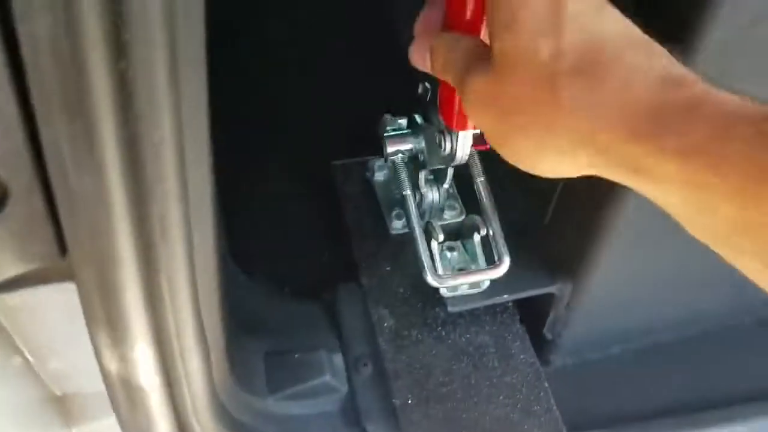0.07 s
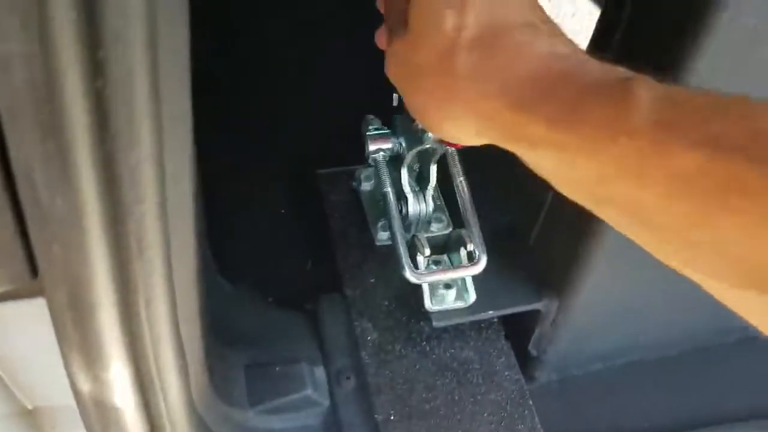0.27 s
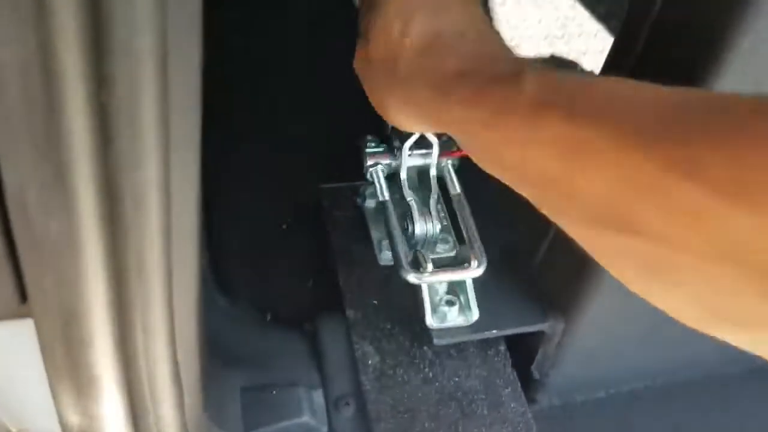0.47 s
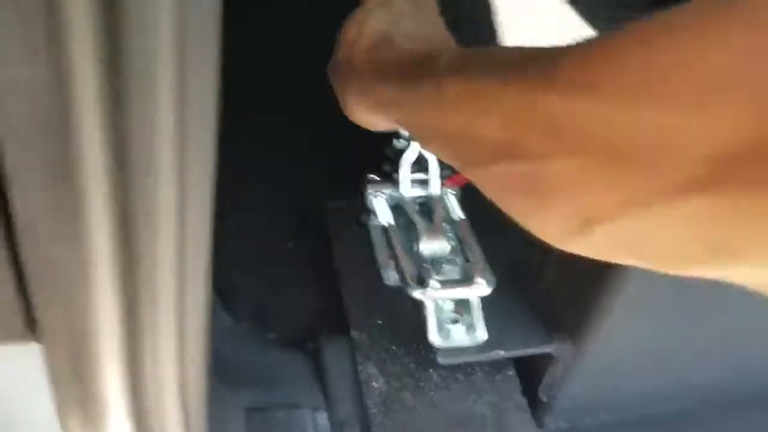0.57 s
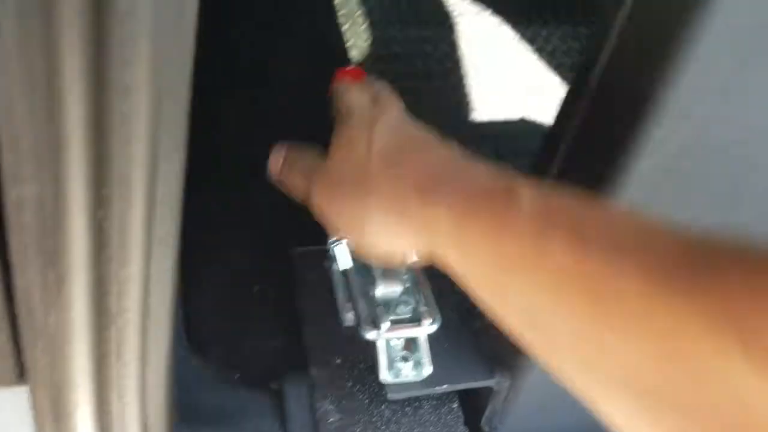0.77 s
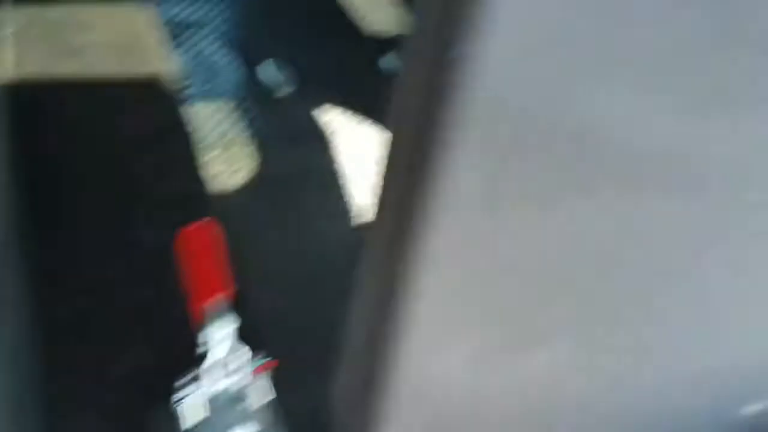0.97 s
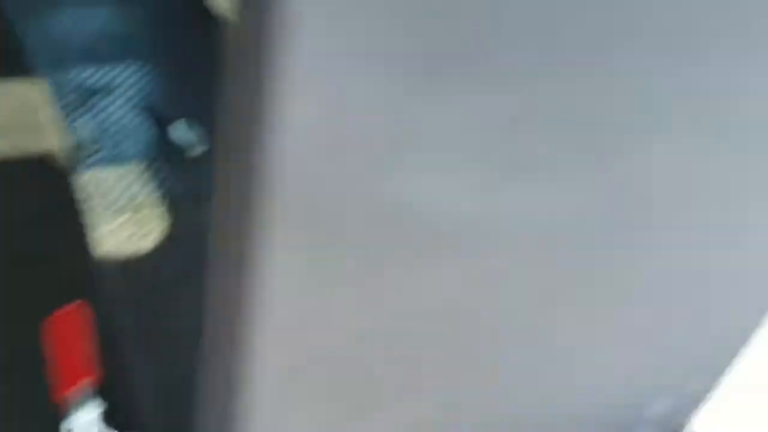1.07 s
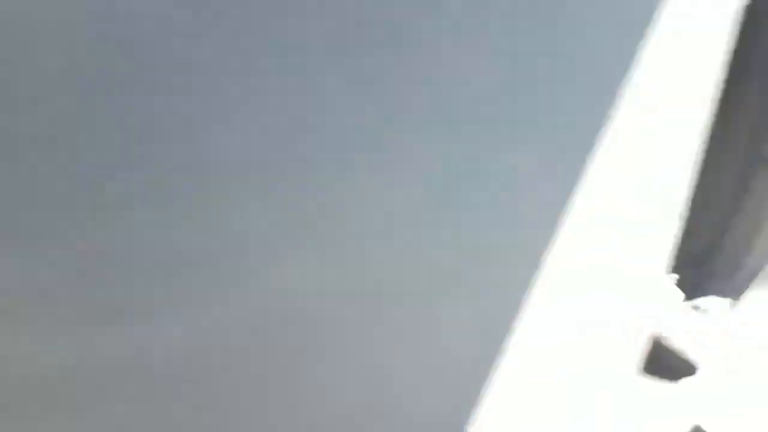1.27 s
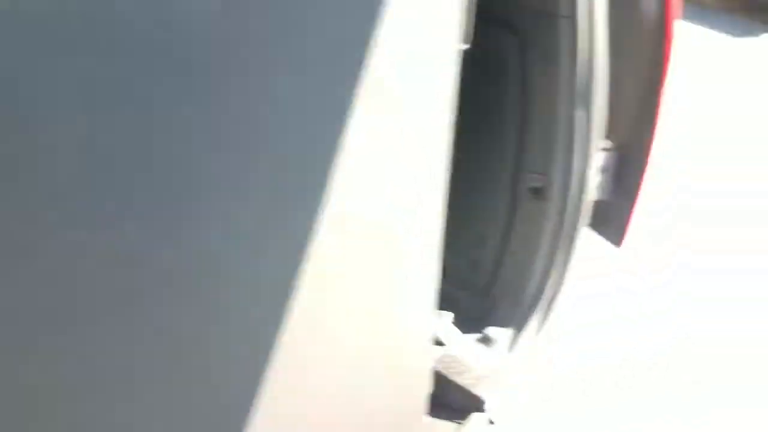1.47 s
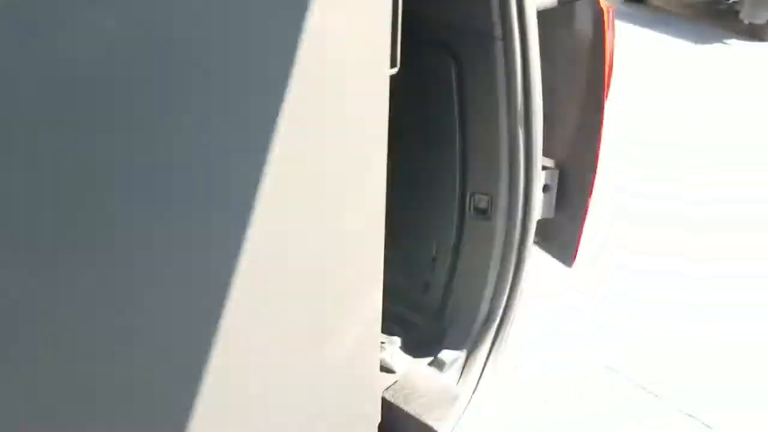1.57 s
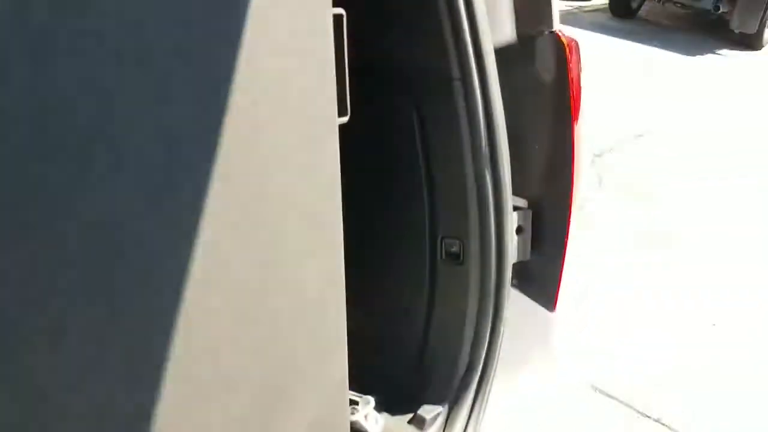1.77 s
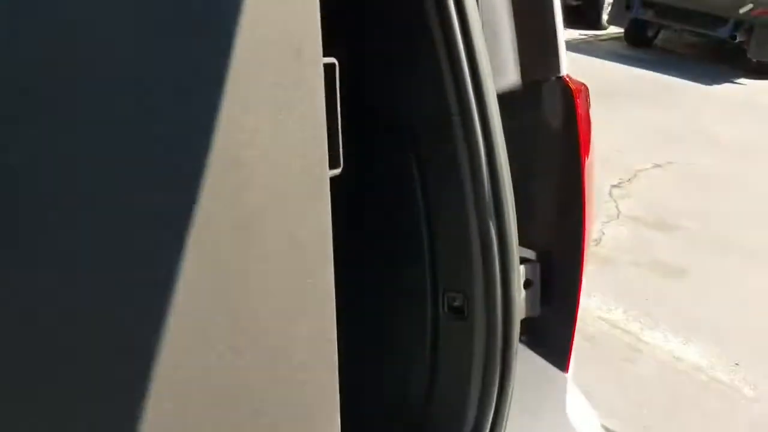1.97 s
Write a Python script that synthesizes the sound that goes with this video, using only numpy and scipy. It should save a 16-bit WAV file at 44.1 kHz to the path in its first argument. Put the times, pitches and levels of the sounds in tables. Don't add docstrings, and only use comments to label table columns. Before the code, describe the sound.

A metal toggle clamp is closed by hand: its loose loop drops and bounces with a bright ring over a hollow panel boom, then the handle snaps in two quick clicks, close-miked, with faint traffic outside.

```python
import sys
import numpy as np
from scipy import signal
from scipy.fft import rfft, irfft
from scipy.io import wavfile
from scipy.ndimage import uniform_filter1d

SR = 44100
rng = np.random.default_rng(int(sys.argv[2]) if len(sys.argv) > 2 else 0)


def to_linear_factor(level_db):
    exponent = np.asarray(level_db, float) / 20
    return 10 ** exponent


def int16_out(signal):
    q = np.round(np.clip(np.atleast_2d(signal).T, -1, 1) * 32767)
    wavfile.write(sys.argv[1], SR, q.astype(np.int16))


N = 88244

# frequency in Hz, spread in radians.
PORT_SPREAD = [(200, 0.68), (500, 0.37), (1200, 1.32), (2000, 2.06), (3000, 0.9), (5000, 1.0), (9000, 1.96),
               (14000, 1.2)]
# frequency in Hz, left over right in dB.
PORT_LEAN = [(60, -8), (110, -4.5), (200, -5.5), (380, -0.5), (700, -4), (1290, 5), (2380, -1.5),
             (4400, -1), (8120, 5), (15000, 3)]


def evened(x):
    return x / np.sqrt(np.mean(x ** 2) + 1e-20)


def read(points, hz):
    f, value = np.transpose(points)
    return np.interp(np.log(hz + 1), np.log(f + 1), value)


def over_time(points, t):
    return np.interp(t, *np.transpose(points))


def lumpy(count, size):
    return evened(uniform_filter1d(rng.standard_normal(count), size=size))


def add(mix, s, sound):
    part = mix[:, round(s * SR):][:, :sound.shape[1]]
    part += sound[:, :part.shape[1]]


def ring(modes, rise_s=.0007, length=.6):
    hz, db, t60 = np.transpose(modes)[:, :, None]
    t = np.arange(0, length, 1 / SR)
    gap = read(PORT_SPREAD, hz) * rng.choice([-1., 1.], hz.shape) / 2
    lean_db = read(PORT_LEAN, hz) / 2
    shape = to_linear_factor(db - 60 * t / t60) * (1 - np.exp(-t / rise_s))
    ports = [shape * to_linear_factor(side * lean_db) * np.sin(2 * np.pi * hz * t + side * gap) for side in (1, -1)]
    return np.array([port.sum(0) for port in ports])


def choked(sound, start, chokes):
    choke_s = 0.00061
    t = start + np.arange(sound.shape[1]) / SR
    return sound * to_linear_factor(sum(db * np.clip((t - s) / choke_s, 0, 1) for s, db in chokes if s > start))


def hiss(colour, count):
    hz = np.fft.rfftfreq(count, 1 / SR)
    a, b = rfft(rng.standard_normal((2, count)))
    same = np.cos(np.clip(read(PORT_SPREAD, hz), 0, 3))
    lean = to_linear_factor(read(PORT_LEAN, hz) / 2)
    z = np.array([a * lean, (same * a + np.sqrt(1 - same ** 2) * b) / lean])
    return evened(irfft(z * to_linear_factor(read(colour, hz)) * (hz > colour[0][0] / 2), count))


def crack(colour, t60):
    # frequency in Hz, width in Hz, depth in dB.
    gaps = [(3700, 200, -14), (6150, 220, -16), (7600, 350, -12), (8700, 250, -10), (12000, 700, -20)]
    tail_db, tail_t60_s, dull_hz, dips_db, rise_s = -13, 0.17, 4000, 4.5, 0.00094
    t = np.arange(8192) / SR
    noise = hiss(colour, count=8192)
    lumps = to_linear_factor(2.5 * lumpy(8192, 120))
    dips = to_linear_factor(dips_db * lumpy(4097, 70))
    hz = np.arange(4097) * SR / 8192
    dips *= to_linear_factor(sum(db * np.exp(-((hz - f) / width) ** 2) for f, width, db in gaps))
    r = np.exp(-2 * np.pi * dull_hz / SR)
    tail = signal.lfilter([1 - r], [1, -r], evened(irfft(rfft(noise) * dips)))
    tail = tail * lumps * to_linear_factor(tail_db - 60 * t / tail_t60_s)
    return (noise * to_linear_factor(-60 * t / t60) + tail) * np.minimum(t / rise_s, 1)


def traffic_wash():
    # time in seconds, level in dB.
    wash_db = [(0, -37), (.35, -41.5), (.6, -43.5), (.75, -49), (1.11, -45.5), (1.13, -42.5), (1.4, -38.5),
               (1.68, -36), (2, -37.5)]
    # frequency in Hz, level in dB.
    colour = [(22, -45.5), (80, -9.5), (200, -11), (372, -6.5), (1320, -4), (2200, -14.5), (4500, -33),
              (7500, -49)]
    # frequency in Hz, likeness of the ports from 0 to 1.
    likeness = [(60, 0), (240, 0.86), (950, 0.032), (3770, 0), (15000, 0.67)]
    # frequency in Hz, left over right in dB.
    balance = [(60, -7.5), (110, -8), (200, -1.5), (380, -1.5), (700, -2), (1290, 0.5), (2380, 1),
               (4400, -1), (8120, 5.5), (15000, 2)]
    # frequency in Hz, width in Hz, gain in dB.
    doorway = [(437, 160, 6.5), (984, 110, 3.5), (1412, 120, 5.5)]
    patch_db, flicker_db, open_db = 1.5, .8, -38.5
    rumble_hz, rumble_width_hz, rumble_hold = 200, 89, 0.89
    frames, hz = N // 256 + 5, np.fft.rfftfreq(1024, 1 / SR)
    a, b, c, d, patches = rng.standard_normal((frames, 513, 5)).T
    patches = evened(uniform_filter1d(uniform_filter1d(patches, size=10, axis=0), size=8, axis=1))
    flicker = lumpy(frames, 4)
    same = np.clip(read(likeness, hz), -1, 1)[:, None]
    lean = to_linear_factor(read(balance, hz) / 2)[:, None]
    left = a + 1j * b
    z = np.array([left * lean, (same * left + np.sqrt(1 - same ** 2) * (c + 1j * d)) / lean])
    colour_db = read(colour, hz) + sum(db * np.exp(-((hz - f) / w) ** 2) for f, w, db in doorway)
    shut_db = open_db - over_time(wash_db, np.arange(frames) * 256 / SR)
    z *= to_linear_factor(rumble_hold * shut_db * np.exp(-((hz[:, None] - rumble_hz) / rumble_width_hz) ** 2))
    z *= to_linear_factor(colour_db[:, None] + patch_db * patches + flicker_db * flicker)
    wash = evened(signal.istft(z, nperseg=1024, noverlap=768)[1][:, :N])
    # frequency in Hz, level in dB.
    mic_hiss = [(5000, -3), (8000, -5), (13000, -6.5), (16000, -0.5)]
    wash += to_linear_factor(-46) * hiss(mic_hiss, count=N)
    t = np.arange(N) / SR
    return (wash + engine_hum(t)) * to_linear_factor(over_time(wash_db, t) + 3.0)


def engine_hum(t):
    # time in seconds, swell in dB.
    swell = [(0, -8), (.7, 4), (.95, 4), (1.03, 7), (1.1, 0.5), (1.18, 7), (1.36, 8), (1.45, -2.5),
             (1.54, 4), (1.66, -3), (1.76, 7), (1.9, 3), (2, 0)]
    hum_hz, width_hz, hum_db = 109, 10, -17
    r = np.exp(-np.pi * width_hz / SR)
    waver = signal.lfilter([1], [1, -r], rng.standard_normal(N) + 1j * rng.standard_normal(N))
    drift = evened(abs(waver)).mean() + waver / abs(waver).mean()
    hum = evened((drift * np.exp(2j * np.pi * hum_hz * t)).real)
    return to_linear_factor(hum_db + over_time(swell, t)) * hum * to_linear_factor([[-2], [2]])


def feet():
    # start in seconds, level in dB, pitch in Hz.
    bumps = [(.06, -27.5, 200), (.1, -29, 182), (0.389, -19.5, 291), (0.522, -29, 215), (0.545, -21, 297),
             (.58, -25, 258.6), (.633, -25, 467), (0.656, -32.5, 209), (.975, -31, 840),
             (1.118, -29.5, 1095), (1.135, -32.5, 860)]
    # frequency in Hz, level in dB.
    sole = [(1760, -32), (3000, -6), (6810, -8.5), (8110, -18.5), (13700, -14), (16000, -18)]
    scuff_s, length_s, scuff_db, fade_db = 1.658, 0.078, -44.5, -13
    out = np.zeros((2, N))
    for s, db, hz in bumps:
        add(out, s, to_linear_factor(db) * ring([(hz, 0, .07), (hz * .74, -5, .06), (hz * 1.3, -6, .05)], 0.0021, .2))
    t = np.arange(0, length_s, 1 / SR)
    shape = np.clip(np.minimum(t / 0.012, (length_s - t) / 0.0078), 0, 1)
    shape = shape * to_linear_factor(scuff_db + fade_db * t / length_s)
    grain = to_linear_factor(1.7 * lumpy(len(t), 150))
    add(out, scuff_s, hiss(sole, count=8192)[:, :len(t)] * shape * grain)
    return out


def bail():
    # start in seconds, then crack, bail ring, panel boom and rattle in dB.
    drops = [(0.0374, -7, -12, -11.5, -32), (0.049, -31, -40.5, -30.5, -43), (0.1322, -13, -18.5, -36, -18),
             (.142, -45, -49, -19.5, -52), (0.1568, -25, -38, -37, -21), (0.1692, -20.5, -26.5, -33, -32),
             (0.1864, -30, -50, -24, -26), (0.1964, -29, -53, -30.5, -26), (.2024, -34, -46.5, -73, -24),
             (0.218, -43.5, -59, -50, -33.5), (.389, -59, -68.5, -27, -60)]
    # frequency in Hz, level in dB, t60 in seconds.
    bail_modes = [(14090, 0, .055), (13190, -17, .07), (15470, -20, .16), (7224, -18, .07),
                  (8559, -12, .05), (9448, -24, .15), (10900, -10, .04), (13370, -20, .08),
                  (14810, -10, .03), (6500, -10, .04), (4800, -8, .022)]
    panel_modes = [(188.7, -25, 0.81), (287.3, -24.5, 0.73), (790, -15.5, 0.12), (916, -16.5, 0.044),
                   (314, -4.5, 0.47), (421.6, -11, 1.5), (437.2, 3, 0.088), (482.6, -8.5, 0.45),
                   (541, -7, 0.22), (601, -10, 0.2), (636, -9.5, .15), (1107, -5, 0.087),
                   (1468, -2.5, 0.085)]
    cavity_modes = [(345.85, 4.5, 0.93), (374.4, -2.5, 1)]
    rattle_modes = [(5050, 3, 0.025), (5230, -11.5, 0.014), (4450, -10.5, .02), (4820, -8.5, 0.033),
                    (5950, -16, 0.055), (3980, -9.5, 0.024)]
    catch_modes = [(3774, -47, 1.7), (5556, -44, .5), (2896, -35, .6), (10306, -19, .13), (10610, -24, .07)]
    # frequency in Hz, level in dB.
    crack_colour = [(500, -19.5), (1300, -6), (4870, -4), (7420, -14.5), (10500, -1.5), (12000, -12.5),
                    (14000, 0.5), (16000, -17)]
    # time in seconds, change in dB.
    panel_chokes = [
        (0.126, -9.5),
        (0.23, -3),
        (.389, -3),
        (0.468, -7),
    ]
    grip_s, grip_db_per_s = .386, 900
    out, steel = np.zeros((2, N)), np.zeros((2, N))
    sing, rattle = ring(bail_modes), ring(rattle_modes)
    boom = ring(panel_modes, rise_s=0.0029) + ring(cavity_modes, rise_s=0.056)
    add(steel, drops[0][0], ring(catch_modes))
    for s, crack_db, ring_db, boom_db, rattle_db in drops:
        add(steel, s, to_linear_factor(ring_db) * sing)
        add(out, s, to_linear_factor(crack_db) * crack(crack_colour, t60=0.015))
        add(out, s, to_linear_factor(boom_db) * choked(boom, s, panel_chokes))
        add(out, s, to_linear_factor(rattle_db) * rattle)
    gripped_s = np.maximum(np.arange(N) / SR - grip_s, 0)
    return out + steel * to_linear_factor(-grip_db_per_s * gripped_s)


def handle():
    # start in seconds, then crack, plate ring, thud and hook ring in dB.
    clicks = [(0.389, -30, -44, -25, -17.5), (0.4744, -9.5, -13.5, -20, -27), (0.476, -23, -26, -43, -34),
              (.486, -20, -15, -43, -34), (0.5037, -11, -14.5, -9.5, -17), (.508, -17, -20.5, -12, -31),
              (.5165, -21.5, -25.5, -21, -39), (.528, -42.5, -33, -34.5, -48.5), (.539, -49, -43, -31, -56),
              (0.551, -58, -43, -46, -63), (0.6319, -28.5, -38, -40, -37.5)]
    # frequency in Hz, level in dB, t60 in seconds.
    plate_modes = [(2906, -4, .05), (2972, -1, .055), (3010, -3, .05), (1830, -2, .07), (1965, -5, .06),
                   (630, -6, .12), (733, -8, .12), (2056, -6, .06), (1300, -13, .1), (1525, -6, .07),
                   (1645, -11, .07), (3108, -10, .07), (4610, -15, .04)]
    thud_modes = [(436, 4, .075), (470, 0, .06), (339, 0, .08), (525, -3, .08), (246, -12, .12),
                  (616, -5, .1), (698, -10, .08)]
    hook_modes = [(4156, 3, 0.013), (2966, -9, 0.036), (10960, -9.5, .015), (4650, -5, 0.012),
                  (6660, -13.5, .015)]
    # frequency in Hz, level in dB.
    crack_colour = [(450, -42), (700, 3), (1900, 6), (2440, -10), (3030, -41), (4440, -6), (8000, -13),
                    (16000, -11)]
    # time in seconds, change in dB.
    plate_chokes = [(.4815, -4), (.494, -6), (.5135, -5), (.531, -13), (.641, -12)]
    thud_chokes = [(.494, -4), (.531, -5.5), (.66, -6)]
    scrape_s = 0.0027
    out, t = np.zeros((2, N)), np.arange(1024) / SR
    plate, thud, hook = ring(plate_modes, rise_s=0.0015), ring(thud_modes, rise_s=0.0031), ring(hook_modes)
    for s, crack_db, plate_db, thud_db, hook_db in clicks:
        shove = rng.standard_normal(1024) * np.exp(-t / scrape_s)
        shove = shove[None] / np.linalg.norm(shove)
        body = signal.fftconvolve(thud, shove, axes=1)[:, :thud.shape[1]]
        chatter_db = 1.4 * lumpy(plate.shape[1], 60)
        add(out, s, to_linear_factor(crack_db) * crack(crack_colour, t60=0.021))
        add(out, s, choked(to_linear_factor(plate_db + chatter_db) * plate, s, plate_chokes))
        add(out, s, choked(to_linear_factor(thud_db) * body, s, thud_chokes))
        add(out, s, to_linear_factor(hook_db) * hook)
    return out


def scene():
    return traffic_wash() + feet() + bail() + handle()


def low_pass(x):
    return signal.sosfilt(signal.butter(12, 16840, fs=SR, output="sos"), x)


def record(dry):
    knee_db, squeeze, recover_db_per_s = -12, 0.39, 80.5
    ceiling, edge_hz = .97, 16300
    power_db = 10 * np.log10(abs(uniform_filter1d((dry ** 2).mean(0), size=200)) + 1e-12)
    fall = np.arange(N) * recover_db_per_s / SR
    held_db = np.maximum.accumulate(power_db + fall) - fall
    over_db = np.maximum(held_db - knee_db, 0)
    held = dry * to_linear_factor(2.5 - squeeze * uniform_filter1d(over_db, size=100))
    held = held / (1 + (held / ceiling) ** 4) ** .25
    edge = signal.firwin(255, edge_hz, window=("kaiser", 8), fs=SR)
    return low_pass(signal.oaconvolve(held, edge[None], "same"))


dry = scene()
out = record(dry)
int16_out(out)
```